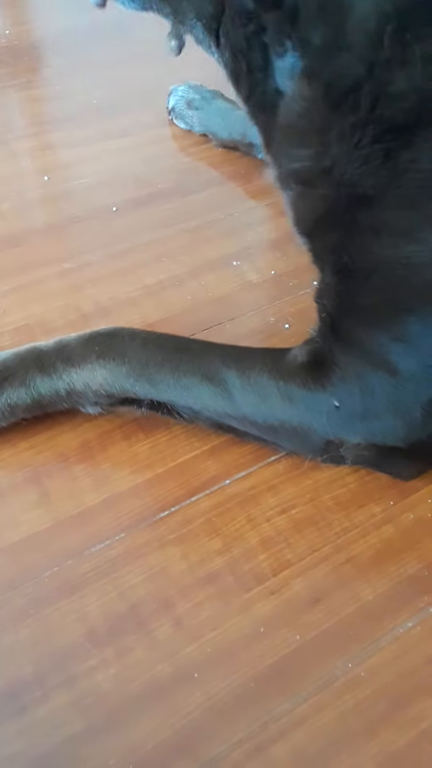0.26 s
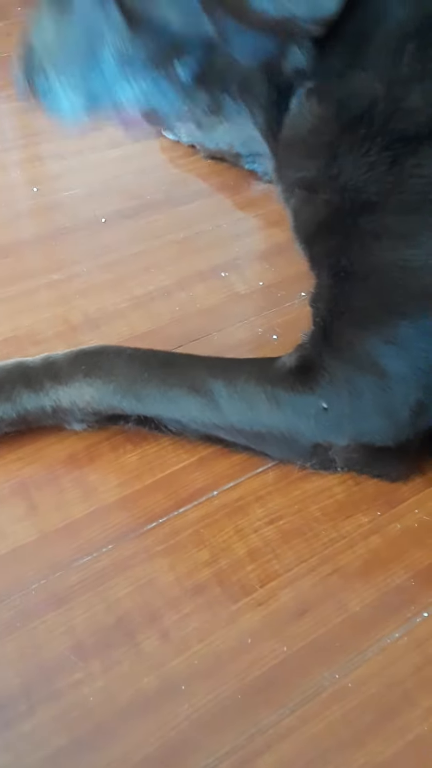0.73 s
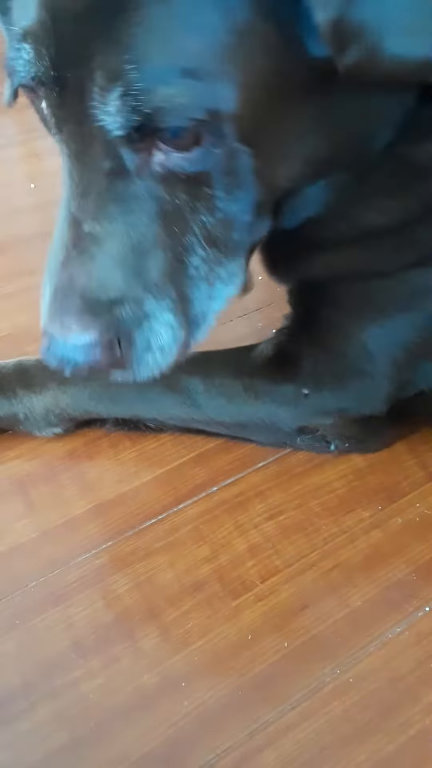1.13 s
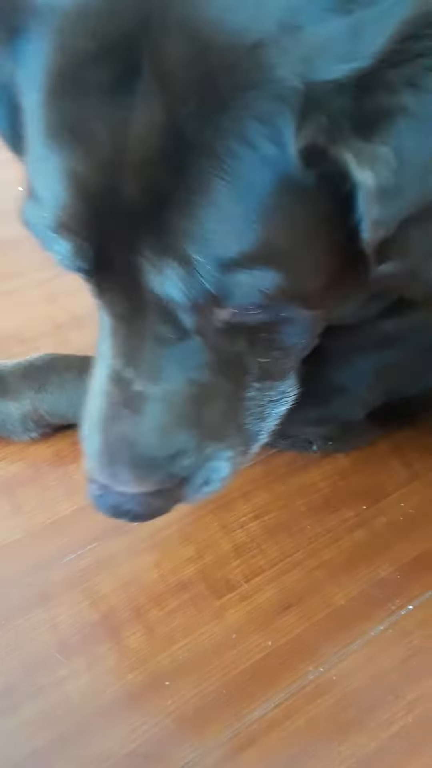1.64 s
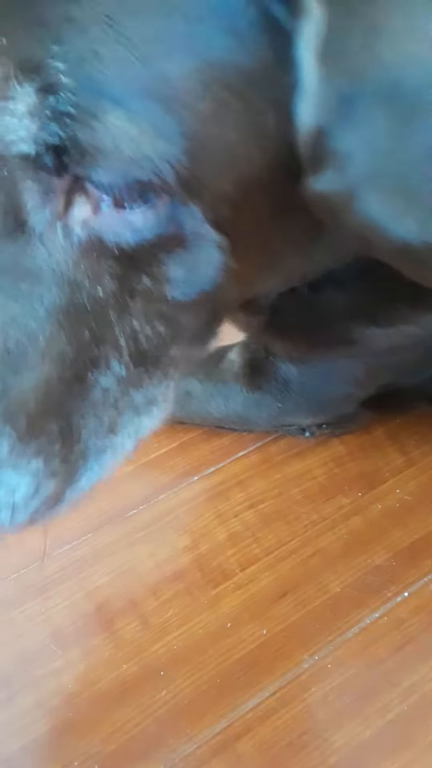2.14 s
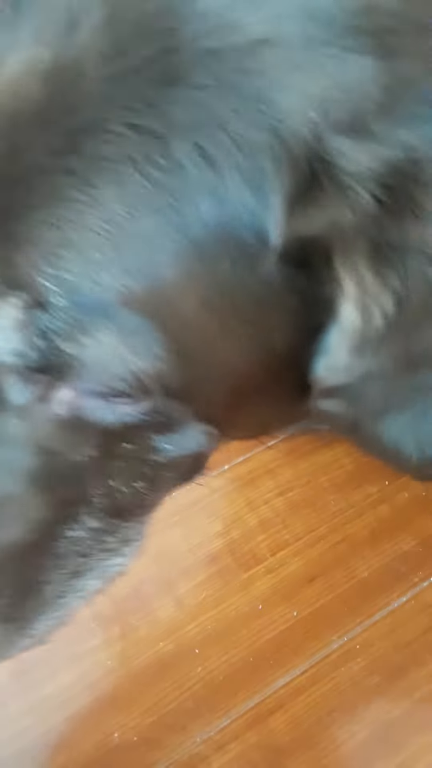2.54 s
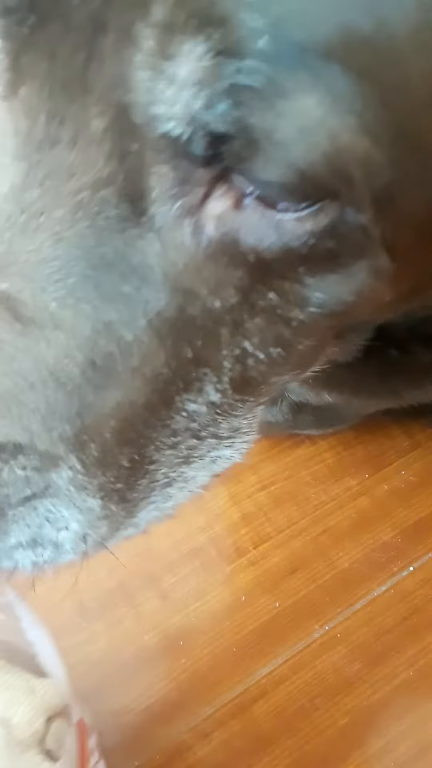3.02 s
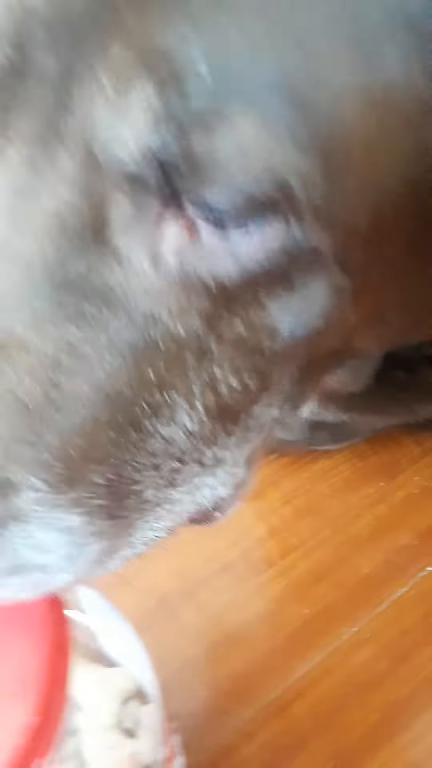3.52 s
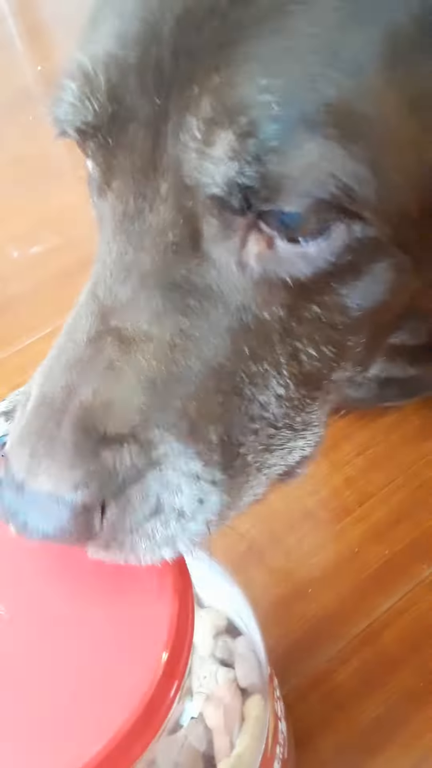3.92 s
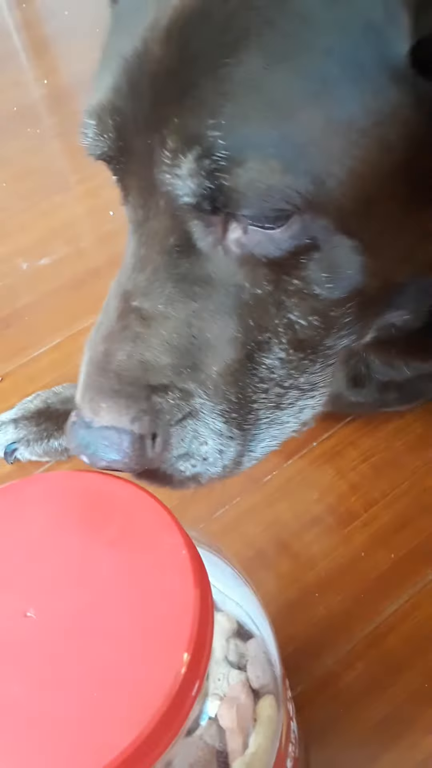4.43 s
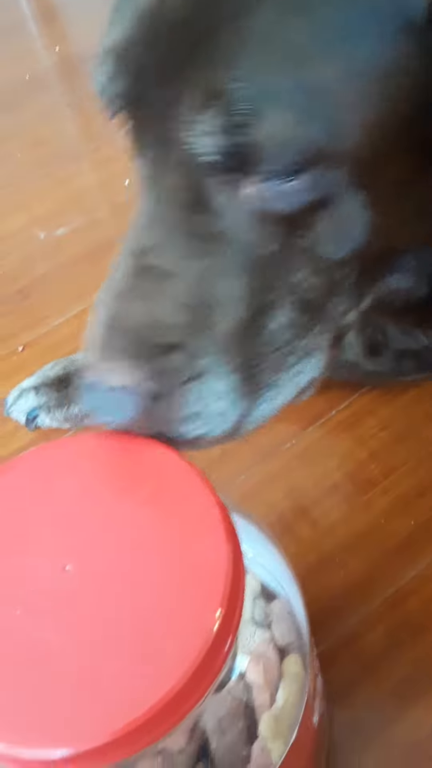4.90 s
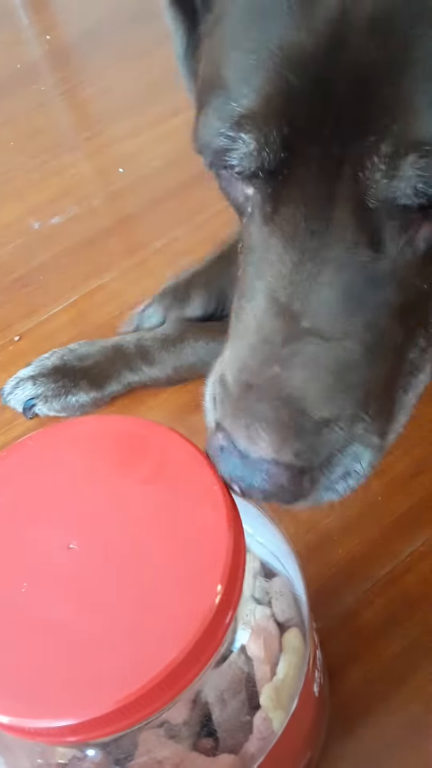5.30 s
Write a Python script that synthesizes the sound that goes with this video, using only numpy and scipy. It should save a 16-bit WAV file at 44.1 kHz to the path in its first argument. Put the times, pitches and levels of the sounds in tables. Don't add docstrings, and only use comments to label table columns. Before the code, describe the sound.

A big dog shifts and sniffs on a hard indoor floor, an elbow knocks loudly, a plastic jar clatters down, and something cracks sharply.

```python
import sys
import numpy as np
from scipy import signal
from scipy.fft import rfft, irfft, next_fast_len
from scipy.io import wavfile
from scipy.ndimage import uniform_filter1d

SR = 44100
rng = np.random.default_rng(int(sys.argv[2]) if len(sys.argv) > 2 else 0)


def field_ratio(decibels):
    return 10 ** (np.asarray(decibels, dtype=float) / 20)


def inscribe(sig):
    pcm = np.round(np.clip(np.atleast_2d(sig).T, -1, 1) * 32767)
    wavfile.write(sys.argv[1], SR, pcm.astype(np.int16))


N = 244745

# pitch in Hz, level in dB per Hz.
AIR_COLOUR = [(15, -45), (25, -47), (60, -50.5), (124, -17.5), (304, -9), (358, 1), (584, 2), (726, 1.5),
              (1730, -12.5), (5720, -32), (8140, -17.5), (9330, -29.5), (15200, -34), (16300, -31.5)]
AIR_DB, HISS_DB = -62, -88.5
# pitch in Hz, width in Hz, level in dB rms.
HUM = [(122.5, 3.7, -64), (357.6, 13, -69)]
# pitch in Hz, likeness from 0 to 1.
LIKENESS = [(60, .9), (150, .95), (300, .75), (600, .55), (1000, .0), (12000, .0)]
# pitch in Hz, time to fall 60 dB in seconds.
ROOM_DECAY = [(80, 0.58), (200, 0.22), (500, 0.36), (1200, 0.5), (3000, 0.52), (7000, 0.29), (12000, 0.48)]

# pitch in Hz, level in dB per Hz.
RUMBLE_COLOUR = [(30, -40), (60, -15.5), (110, 3.5), (200, -0.5), (280, -1), (500, -38.5)]
DRAG_COLOUR = [(35, -23.5), (60, -57.5), (170, -10.5), (291, -12.5), (683, -2), (874, -8), (1600, -10.5),
               (2080, -24), (3520, -120)]
GRIT_COLOUR = [(710, -5), (1200, 4.5), (1430, 6.5), (2480, 6), (3700, 3.5), (5050, -9.5), (7720, -9),
               (9500, -32.5), (12400, -63), (20900, -120)]
HAIR_COLOUR = [(5180, -6), (8800, -8), (13900, -20), (15700, -28), (16300, -29.5), (16500, -33)]
PAW_COLOUR = [(650, -26), (1100, -23.5), (1230, -5), (1410, -12.5), (1610, -3.5), (1760, -8.5),
              (2880, -0.5), (7900, -18.5), (9770, -28.5), (14600, -37), (16000, -53)]

# peak in seconds, level in dB, swell and fade (one time) in seconds.
LURCHES = [(0.05, -55.5, 0.51), (0.3, -56, 0.75), (0.6, -64, 0.25), (0.725, -45.5, 0.045),
           (0.94, -58.5, 0.83), (1.13, -53.5, 0.44), (1.73, -57, 0.11), (1.86, -60, 0.042),
           (2.4, -60.5, 0.58), (2.72, -51.5, 0.35), (2.86, -52.5, 0.091), (3.03, -50.5, 0.11),
           (3.3, -55, 1), (4.3, -63.5, 1), (4.86, -61.5, 0.51), (5.3, -53, 0.3), (5.44, -59.5, 0.62)]
# peak in seconds, grit in dB, swell and fade in seconds, drag in dB relative.
PUSHES = [(0.0, -54.5, 0.054, 0.18, 0.5), (0.185, -60.5, 0.074, 0.25, 5), (0.36, -68.5, 0.27, 0.63, 14.5),
          (0.52, -52, 0.18, 0.27, -0.5), (0.73, -73, 0.28, .3, 10), (0.86, -63.5, 0.097, 0.063, 8.5),
          (0.915, -57.5, 0.026, 0.11, 6), (1.02, -73.5, 0.51, 1, 14.5), (1.6, -63, 1, 0.047, 5),
          (1.73, -63.5, 0.1, 0.081, -12), (1.97, -63.5, 0.061, 0.28, 5.5), (2.18, -54, 0.12, 0.65, -1),
          (2.42, -53, 0.046, 0.29, 2), (2.5, -50.5, 0.11, 0.12, 5.5), (2.665, -44.5, 0.085, 0.22, 4.5),
          (2.86, -46, 0.15, 0.23, 0.5), (3.0, -48, 0.29, 0.33, -5.5), (3.1, -50.5, 0.15, 0.23, 3.5),
          (3.32, -43.5, 0.06, 0.18, -9.5), (3.5, -75, 0.078, 0.11, -5), (4.25, -58, 0.92, 0.13, 1),
          (4.38, -72, 0.13, 0.23, 14), (4.51, -77, 0.069, 0.66, 15), (4.865, -66, 0.043, 0.088, 1.5)]
# peak in seconds, level in dB, swell and fade in seconds.
BRUSHES = [(0.0, -73, .05, 0.42), (0.185, -55, 0.014, 0.12), (0.55, -63, 0.6, 0.25),
           (0.73, -52, 0.14, 0.37), (0.93, -60, 0.2, 0.81), (1.58, -64.5, 0.47, .05),
           (2.05, -84, 0.092, .2), (2.2, -80, 0.13, .3), (2.35, -77, 0.11, 0.3), (2.49, -49, 0.17, 0.14),
           (2.665, -37.5, 0.072, 0.36), (2.86, -62, 0.078, 0.93), (3.02, -53, 1, 0.067),
           (3.11, -51, 0.51, 0.18), (3.36, -58.5, 0.068, 0.37), (3.49, -50, 0.094, 0.4),
           (4.61, -62, 0.12, 0.057)]
# peak in seconds, level in dB, swell and fade in seconds.
SWISH = [(3.49, -51, 0.039, 0.57)]
AIRY_DB = -1
ROUNDNESS = 1.04

# peak in seconds, level in dB, swell and fade in seconds.
SNIFFS = [
    [(0.496, -47.5, 0.035, 0.072)],
    [(0.51, -50.5, 0.055, 0.33)],
    [(0.62, -52.5, 0.093, 0.061)],
    [(0.81, -56.5, 0.72, 0.097)],
    [(2.666, -37.5, 0.054, 0.19)],
    [(3.265, -49.5, 0.017, 0.15), (3.345, -47.5, 0.086, 0.04), (3.42, -45, 0.03, 0.055),
     (3.46, -46, 0.041, 0.1)],
    [(4.368, -50.5, 0.027, 0.11), (4.49, -54.5, 0.02, 0.11)],
]
# pitch in Hz, width in Hz, level in dB.
NOSES = [
    [(1680, 140, -7)],
    [(4500, 300, 1.5), (8200, 380, -9.5)],
    [(4600, 690, 3), (8040, 700, -15)],
    [(3500, 1400, -1.5), (8100, 1300, 7)],
    [(2800, 350, -10.5), (3650, 220, -5.5)],
    [(538, 89, 7), (3010, 370, 2), (1370, 900, -20)],
    [(493, 57, 9), (2230, 60, 1.5), (3000, 810, -13), (1430, 650, -4.5)],
]

# time in seconds, peak in dB, pitch in Hz, sizzle in dB relative.
CLAWS = [(0.171, -58, 2550, -12.5), (0.834, -38, 2480, 4), (0.8558, -35, 3380, -16),
         (0.9052, -32, 3000, -14), (1.2592, -41, 3300, -17), (1.7225, -43.5, 1900, -26),
         (2.9, -29, 2185, -21), (2.905, -32, 2610, -23), (3.4185, -42, 2400, -27), (3.4542, -40, 3120, -24),
         (3.461, -32.5, 3000, -25), (4.3617, -58, 2300, -25), (4.4865, -55.5, 2300, -25.5),
         (4.8660, -51.5, 2304, -12), (5.113, -46, 3060, -22)]
# time in seconds, peak in dB, pitch in Hz, sizzle in dB relative.
CRUMBS = [(0.3578, -50, 1986, -27), (2.4052, -45, 2530, -4), (2.5132, -46, 1600, -20),
          (2.646, -42, 2820, -9), (2.6592, -27, 3650, -1), (2.7840, -33, 3800, -6),
          (2.8275, -29, 5370, -23), (3.0845, -42, 1890, -1)]

# time in seconds, peak in dB, pitch in Hz, left-right in dB.
SPECKS = [(.3983, -40, 6960, -2), (.6622, -54, 13500, 8), (.863, -51, 12000, -10), (.910, -38, 7500, -6),
          (1.5507, -52, 9000, -10), (1.9982, -50.5, 13700, 6), (1.9985, -47, 6800, 1),
          (2.0325, -52, 13500, -4), (2.033, -38.5, 6960, -5), (2.0578, -63, 11000, -3),
          (2.1012, -58, 7530, -14), (2.1223, -56, 11000, -6), (2.2273, -41, 6500, -19),
          (2.2433, -47, 8000, -13), (2.357, -39, 7500, -15), (2.4827, -25, 7260, -14),
          (2.4888, -48, 13000, -15), (2.630, -24.5, 11000, -17), (2.6667, -31, 7000, -13),
          (2.6713, -32, 7000, -12), (2.6853, -21.5, 7000, -18), (2.7929, -24, 13500, -20),
          (2.793, -28.5, 3500, -11), (2.8198, -22, 6000, -17), (2.854, -33, 13000, -22),
          (2.8736, -24, 5940, -14), (2.877, -42, 8200, -8), (2.958, -38, 13000, 9),
          (3.1065, -44, 8500, -10), (3.1408, -51, 12900, -14), (1.2783, -11.5, 13200, -8.5),
          (1.2785, -10, 7680, 1.5), (3.6893, -22.5, 13000, -17), (3.6900, -28, 7000, 7),
          (3.6992, -34, 7500, -12), (3.7185, -25, 7000, -9), (3.7243, -38, 6000, -8),
          (3.7308, -19, 6960, -8), (3.7328, -35, 5500, -7.5), (3.7503, -26, 11000, -10.5),
          (3.7516, -18, 7000, -14), (3.765, -37, 5000, -11), (3.744, -36, 6500, -9),
          (3.7588, -28, 6500, -13), (3.824, -37, 13000, -17), (3.9045, -40, 13500, 13.5),
          (3.9215, -29, 7000, -6.5), (3.9285, -27, 12060, -2), (5.183, -21, 5670, 0),
          (5.335, -41, 6500, -6), (5.352, -46, 6500, 11), (5.3966, -31, 7000, -5), (5.4137, -36, 6500, 8)]
# time in seconds, peak in dB, pitch in Hz, left-right in dB.
TOUCHES = [(1.169, -46, 3500, -4), (1.198, -37.5, 4040, -5), (1.2335, -49.5, 4000, -6.5),
           (3.5850, -44, 4500, 0), (3.5875, -30, 1090, 0), (3.6628, -41, 4000, 0), (2.6515, -36, 3000, -6),
           (2.784, -36, 7500, -10), (3.724, -26, 4000, -6)]
# time in seconds, peak in dB, pitch in Hz, left-right in dB.
CHIPS = [(3.6894, -14, 2140, -7), (3.6897, -14.5, 3300, -3), (3.690, -11, 4530, -10),
         (3.7180, -24.5, 3120, -3), (3.7503, -13, 3450, -4), (3.7615, -21.5, 2300, -2),
         (3.877, -35.5, 3000, -1), (5.191, -39, 2950, 2), (5.2225, -35, 2600, 2), (5.246, -36, 2880, -6),
         (5.262, -33, 2880, 0), (5.2785, -24, 2400, 4), (5.2905, -29, 2800, 0), (5.3435, -20.5, 2740, 6)]
# time in seconds,
# peak in dB, pitch in Hz, left-right in dB.
SHARDS = [(3.9118, -3, 1730, 4), (3.9119, -2.5, 6600, -13), (3.9121, -2.5, 3300, -1.5),
          (3.9119, -25, 13500, -11), (3.9132, -13, 1900, -1), (2.6593, -19, 4100, -5),
          (2.8277, -22, 4700, -14), (.8344, -33, 6900, -14), (4.8663, -51, 5300, -5),
          (3.7325, -18, 4500, -3), (3.741, -28, 2400, -8)]
# time in seconds, peak in dB, pitch in Hz, left-right in dB.
CATCHES = [(5.181, -29.5, 584, -1), (5.203, -38, 550, 4), (5.258, -24, 616, 2.5), (5.259, -26, 1240, -6),
           (5.274, -36.5, 537, -3), (5.288, -42, 554, -5), (5.333, -31, 1200, 0)]

# peak in seconds, scrape in dB, swell and fade in seconds, board ring in dB relative.
JERKS = [(5.12, -78.5, 0.011, .3, -12), (5.187, -33.5, 0.05, 0.26, -12.5), (5.228, -33, 0.063, .15, -15),
         (5.268, -32.5, 0.04, 0.076, -9), (5.297, -38, .02, 0.11, -15), (5.345, -38, 0.064, 0.13, -11),
         (5.40, -42, 0.11, 0.18, -8.5), (5.43, -63, 0.1, 0.078, -6), (5.53, -59, 0.15, 0.31, 5.5)]
TOUCH_S = 5.109

# time in seconds, peak in dB, pitch in Hz, time to fall 60 dB in seconds.
THUDS = [(3.5867, -31.5, 108, 0.084), (3.5882, -26, 268, 0.077), (3.695, -14.5, 339, 0.066),
         (3.7228, -13.5, 285, .07), (3.7331, -17, 342, .04), (3.7544, -11.5, 274, 0.059),
         (3.7625, -15, 251.4, .06), (3.725, -25, 152, .1)]

# time in seconds, crack peak in dB, thud in dB, knock in dB, room in dB.
PADS = [(1.1660, -45, -29, -39, -58.5), (1.1945, -44, -28, -33, -52), (1.2320, -55.5, -33, -50.5, -48),
        (1.5964, -58, -37.5, -47.5, -58)]
ELBOW = [
    (1.2782, -17, -19.5, -27.5, -33),
    (1.2791, -0.5, -32, -7.5, -7),
]
JAR = [(3.585, -59, -42, -33, -28), (3.6630, -37, -32, -40, -36.5), (3.6894, -17, -15, -20, -17),
       (3.7193, -35, -18, -43, -24), (3.7222, -25, -25.5, -24, -8), (3.731, -12, -26, -13, -24.5),
       (3.7503, -18, -38, -20, -40), (3.7612, -30, -34, -47, -34), (3.8235, -56, -38, -57.5, -31)]
BITE = [
    (3.9117, -5, -17.5, -13, -6.5),
]

# pitch in Hz, level in dB, time to fall 60 dB in seconds.
SOFT_BOARDS = [(200, 0, .045), (290, -3, .035), (400, -1, .03), (560, -5, .02), (1050, -5, .015)]
BOARDS = [(177, 0.5, 0.029), (209.8, 7.5, 0.15), (276, -1, 0.08), (373, 0.5, 0.04), (610, -5, 0.014),
          (729, 7.5, 0.0081), (1221, 0.5, 0.018), (1535, -6.5, 0.045), (1724, 3, 0.017),
          (2120, -17, 0.0073), (2820, -3, 0.023), (3256, -10, 0.017), (3630, -14, 0.016),
          (4360, -9.5, 0.015)]
PLASTIC = [(212, -4, 0.11), (239, -15, 0.02), (280, 0.5, 0.04), (353.6, -0.5, 0.097), (649, -1, 0.06),
           (810, 7, 0.018), (1150, 5, 0.026), (1803, 1.5, 0.016), (3300, -15, 0.015)]
BISCUIT = [(166.4, 1.5, 0.027), (207, -8.5, 0.26), (300, -5.5, 0.056), (389.3, -4, 0.1), (616, -2, 0.084),
           (845, -3.5, 0.029), (1010, -16.5, 0.032), (1154, 2.5, 0.041), (1648, -10.5, 0.04),
           (1716, 1, 0.0466), (1890, -12, 0.035), (2140, 3, 0.024), (2300, 4.5, 0.04), (3250, -10, 0.018)]

# pitch in Hz, level in dB per Hz.
ELBOW_ECHO = [(35, -61), (60, -33.5), (199, -6.5), (297, -3), (334, -2), (464, -13), (1250, -14),
              (1550, -9.5), (2040, -15.5), (3000, -18.5), (3600, -14.5), (4300, -18), (5200, -26),
              (8200, -25.5), (9610, -34), (13700, -34.5), (16300, -49.5)]
JAR_ECHO = [(35, -66.5), (60, -66), (208, 5), (350, -1.5), (464, -9.5), (1130, -11.5), (1370, -16),
            (1770, -16.5), (2290, -25), (3500, -23), (8200, -34.5), (9500, -37), (13000, -44), (16500, -46)]
BITE_ECHO = [(35, -40), (60, -22), (276, 0.5), (318, 0), (464, -12.5), (615, 0.5), (796, -10), (1130, 1.5),
             (1350, -7), (1770, -1), (1950, -6.5), (2200, -1.5), (2520, -11), (4500, -14), (7960, -18),
             (9500, -26), (16300, -37.5)]
SHADOW_HZ = 450


def rms_one(x):
    return x / np.sqrt(np.mean(x ** 2) + 1e-20)


def at_hz(points, hz):
    table = np.array(points)
    return np.interp(np.log(hz), np.log(table[:, 0]), table[:, 1])


def last(rows):
    return np.array(rows)[:, -1:]


def add(out, s, sound):
    at = round(s * SR)
    out[..., at:at + sound.shape[-1]] += sound[..., :N - at]


def drift(rate):
    r = np.exp(-80 * np.pi * rate / SR)
    noise = rng.standard_normal(N // 40 + 2002)
    slow = signal.lfilter([1], [1, -2 * r, r * r], noise)[2000:]
    return np.interp(np.arange(N) / 40, np.arange(len(slow)), rms_one(slow))


def swells(rows, extra_db=0):
    s, db, *slopes_s = np.transpose(rows)[:4, :, None]
    t = np.arange(0, N + 64, 64) / SR - s
    rise, fall = -t / np.abs(slopes_s[0]), t / np.abs(slopes_s[-1])
    loss_db = 20 * np.maximum(rise, fall) ** ROUNDNESS
    gain = np.sqrt(np.sum(field_ratio(db + extra_db - loss_db) ** 2, axis=0))
    return np.interp(np.arange(N) / 64, np.arange(len(gain)), gain)


def resonance(x, hz, width_hz):
    r = np.exp(-np.pi * width_hz / SR)
    gain = np.array([1, 0, -1]) * (1 - r * r) / 2
    return signal.lfilter(gain, [1, -2 * r * np.cos(2 * np.pi * hz / SR), r * r], x)


def coloured(pair, spectrum):
    length = pair.shape[1]
    size = next_fast_len(length)
    hz = np.fft.rfftfreq(size, 1 / SR) + 1
    mid, side = rfft(pair, size)
    alike = np.clip(at_hz(LIKENESS, hz), -1, 1)
    both = np.sqrt(1 + alike) * mid + np.sqrt(1 - alike) * side * [[1], [-1]]
    return rms_one(irfft(both * field_ratio(at_hz(spectrum, hz)), size)[:, :length])


def friction(per_s, spread_db, smooth, flicker_db):
    sizes = field_ratio(spread_db * np.minimum(rng.exponential(1, N), 4))
    slips = sizes * (rng.random(N) < per_s / SR)
    height = smooth + rms_one(uniform_filter1d(slips, size=24))
    return rng.standard_normal((2, N)) * height * field_ratio(flicker_db * drift(30))


def crack(hz, length_s, sizzle_hz, sizzle_db, width=.5):
    t = np.arange(1800) / SR
    burst = rng.standard_normal(1800) * np.exp(-t / length_s) * (1 - np.exp(-t / 0.0003))
    body = resonance(burst, hz, width * hz)
    sizzle = burst
    for _ in range(2):
        sizzle = resonance(sizzle, sizzle_hz, .7 * sizzle_hz)
    return body / np.abs(body).max() + field_ratio(sizzle_db) * sizzle / np.abs(sizzle).max()


def background():
    out = field_ratio(AIR_DB - 1.5) * coloured(rng.standard_normal((2, N)), AIR_COLOUR)
    for hz, width_hz, db in HUM:
        out = out + field_ratio(db) * rms_one(resonance(rng.standard_normal(N), hz, width_hz))
    return out


def room(echo):
    t = np.arange(26000) / SR
    reflections = rng.random(26000) * (rng.random(26000) < 400 / SR)
    walls = rms_one(uniform_filter1d(reflections, size=60))
    noise = rng.standard_normal((2, 26000)) * (1 + .4 * walls * np.exp(-t / .06))
    noise = coloured(noise, echo)
    edges = 50 * 2 ** np.arange(0, 8.6, .5)
    out = 0
    for low, high in zip(edges, edges[1:]):
        band = signal.sosfilt(signal.butter(1, [low, high], "band", fs=SR, output="sos"), noise)
        out = out + band * field_ratio(-60 * t / at_hz(ROOM_DECAY, np.sqrt(low * high)))
    return out * np.clip((t - .003) / 0.0073, 0, 1)


def slides():
    weight = friction(300, 3.5, 3.0, 1.8)
    rub = friction(900, 2.8, 3.0, 1.2)
    hair = coloured(rub, HAIR_COLOUR)
    airy = resonance(resonance(hair, hz=13500, width_hz=4500), hz=14500, width_hz=4500)
    airy = rms_one(airy) * field_ratio(-15)
    out = swells(LURCHES) * coloured(weight, RUMBLE_COLOUR)
    out = out + swells(PUSHES, last(PUSHES)) * coloured(weight, DRAG_COLOUR)
    out = out + swells(PUSHES) * coloured(rub, GRIT_COLOUR)
    out = out + swells(BRUSHES) * hair
    out = out + (swells(BRUSHES, AIRY_DB) + swells(SWISH)) * airy
    return out * field_ratio([[-.7], [.7]])


def sniffs():
    out = 0
    for rows, nose in zip(SNIFFS, NOSES):
        air = rng.standard_normal((2, N))
        tone, sign = 0, 1
        for hz, width_hz, db in nose:
            tone = tone + sign * field_ratio(db) * resonance(air, hz, width_hz)
            sign = -sign
        out = out + swells(rows) * field_ratio(2.2 * drift(31)) * rms_one(tone)
    return out


def ticks(rows, pan_db):
    out = np.zeros((2, N))
    for s, db, hz, sizzle_db in rows:
        left = crack(hz, 0.0027, 7500, sizzle_db - 1.0)
        right = crack(hz, 0.0017, 9500, sizzle_db - 7.0)
        add(out, s, field_ratio(db - 0.5) * np.array([left, right]) * field_ratio([[pan_db / 2], [-pan_db / 2]]))
    return out


def chips(rows, length_s, width, sizzle_db):
    out = np.zeros((2, N))
    for s, db, hz, pan_db in rows:
        breaks = [crack(hz, length_s, 14000, sizzle_db, width) for side in range(2)]
        pair = resonance(np.array(breaks), hz, 0.98 * hz)
        add(out, s, field_ratio(db) * pair * field_ratio(np.minimum([[pan_db], [-pan_db]], 0)))
    return out


def paw():
    rub = friction(1500, 1.8, 6.4, 0.7)
    scrape = coloured(rub, PAW_COLOUR)
    scrape = rms_one(scrape + field_ratio(-7.0) * resonance(scrape, 2380, 640))
    boards = rms_one(resonance(rub, 520, 230) + field_ratio(-3.5) * resonance(rub, 860, 480))
    touching = np.clip((np.arange(N) / SR - TOUCH_S) * 200, 0, 1)
    return field_ratio(1.0) * touching * (swells(JERKS) * scrape + swells(JERKS, last(JERKS)) * boards)


def thuds():
    out, t = np.zeros(N), np.arange(8000) / SR
    for s, db, hz, t60 in THUDS:
        onset = 1 - np.exp(-t * hz / .2)
        add(out, s, field_ratio(db - 60 * t / t60) * onset * np.sin(2 * np.pi * hz * t))
    return out * field_ratio([[-1.5], [1.5]])


def blows(rows, modes, echo, crack_hz, length_s, sizzle_db, ring_db, pan_db, lag_s, cut_hz, detune):
    direct, feed, t = np.zeros(N), np.zeros(N), np.arange(8000) / SR
    soften = signal.butter(3, cut_hz, fs=SR)
    for s, crack_db, thud_db, knock_db, room_db in rows:
        sound, sent = np.zeros(8000), 1. * (t == 0)
        burst = crack(crack_hz, length_s * field_ratio(-.25 * crack_db), 4100, sizzle_db)
        sound[:1800] = field_ratio(crack_db) * (0.19 * burst + signal.lfilter(*soften, burst))
        for hz, db, t60 in modes:
            level_luck, pitch_luck = rng.standard_normal(2)
            onset = 1 - np.exp(-t * hz / 0.4)
            wave = np.sin(2 * np.pi * hz * (1 + detune * pitch_luck) * t)
            ring = field_ratio(db + 65 * detune * level_luck - 60 * t / t60) * onset * wave
            sound += field_ratio((thud_db if hz < 450 else knock_db) - 3) * ring
            sent += field_ratio(ring_db) * ring
        add(direct, s, sound)
        add(feed, s, field_ratio(room_db - 15) * sent)
    low = signal.lfilter(*signal.butter(1, SHADOW_HZ, fs=SR), direct)
    high = direct - low
    pair = np.array([high, np.roll(high, round(lag_s * SR))])
    echoes = signal.fftconvolve(feed[None], room(echo), axes=1)[:, :N]
    return low + pair * field_ratio([[pan_db / 2], [-pan_db / 2]]) + echoes * field_ratio([[-.6], [.6]])


def scene():
    pads = blows(PADS, SOFT_BOARDS, JAR_ECHO, 1750, 0.00078, sizzle_db=-2, ring_db=-54.5,
                 pan_db=-1.5, lag_s=.0003, cut_hz=21000, detune=.02)
    elbow = blows(ELBOW, BOARDS, ELBOW_ECHO, 2200, 0.00087, sizzle_db=-11.5, ring_db=-47,
                  pan_db=-5.5, lag_s=.0003, cut_hz=5400, detune=0.004)
    jar = blows(JAR, PLASTIC, JAR_ECHO, 1960, 0.0014, sizzle_db=-30.5, ring_db=-56,
                pan_db=-7.5, lag_s=-0.00012, cut_hz=2600, detune=0.044)
    bite = blows(BITE, BISCUIT, BITE_ECHO, 2600, 0.00019, sizzle_db=-34, ring_db=-46.5,
                 pan_db=-7.5, lag_s=0.00023, cut_hz=3400, detune=.003)
    small = ticks(CLAWS, pan_db=-1.5) + ticks(CRUMBS, pan_db=-22)
    small = small + chips(SPECKS, 0.00067, 0.47, sizzle_db=-12)
    small = small + chips(CHIPS, 0.00079, 0.062, sizzle_db=-34)
    small = small + chips(CATCHES, 0.0036, 0.063, sizzle_db=-30)
    out = pads + elbow + jar + bite + small
    out = out + slides() + sniffs() + paw() + background()
    out = out + chips(SHARDS, .0006, 0.38, sizzle_db=-26.5)
    return out + thuds() + chips(TOUCHES, 0.0017, .7, sizzle_db=-25)


def roll_off(x):
    return signal.sosfilt(signal.butter(12, 16860, fs=SR, output="sos"), x)


def record(dry):
    mix = signal.sosfilt(signal.butter(3, 60, "high", fs=SR, output="sos"), dry)
    mix = mix - 0.6 * resonance(mix, 9640, 2000)
    mix = mix + field_ratio(HISS_DB) * np.diff(rng.standard_normal((2, N + 1)))
    mix = .98 * np.tanh(mix / .98)
    mix = signal.sosfilt(signal.ellip(10, .5, 80, 16150, fs=SR, output="sos"), mix)
    return roll_off(mix)


dry = scene()
out = record(dry)
inscribe(out)
```